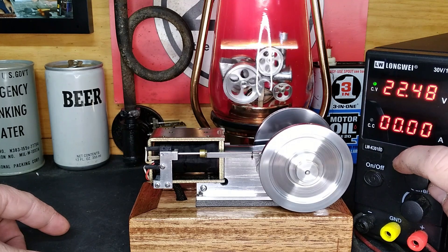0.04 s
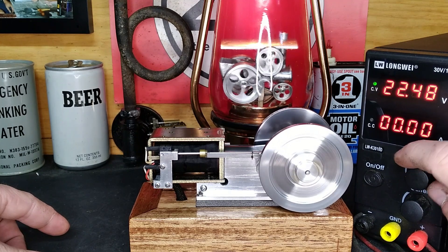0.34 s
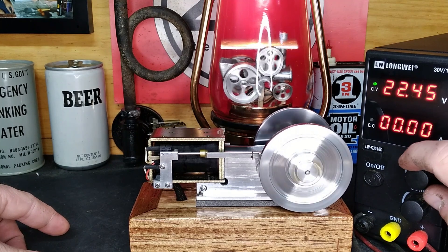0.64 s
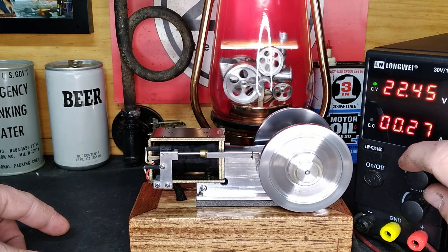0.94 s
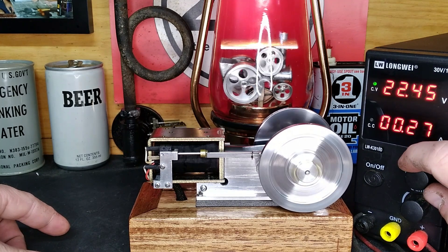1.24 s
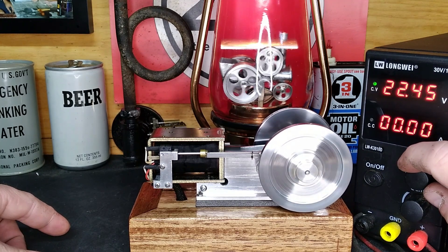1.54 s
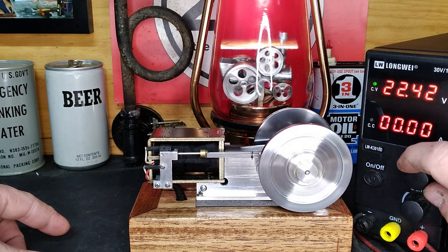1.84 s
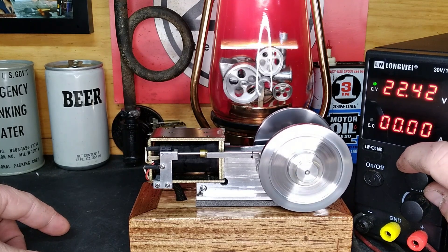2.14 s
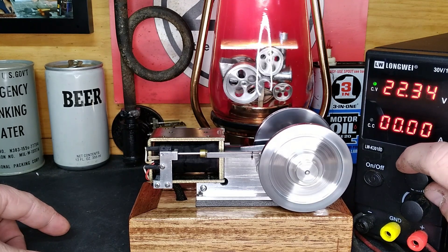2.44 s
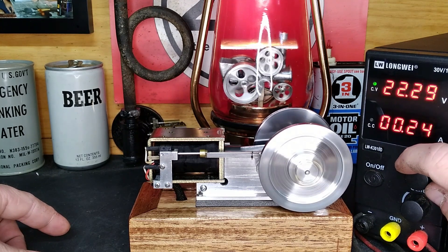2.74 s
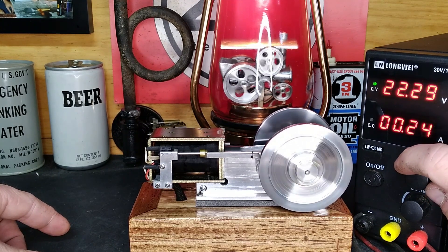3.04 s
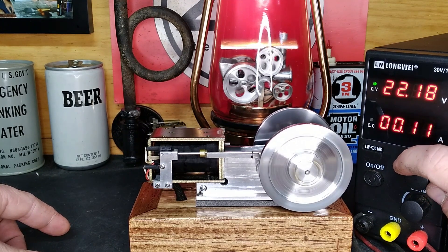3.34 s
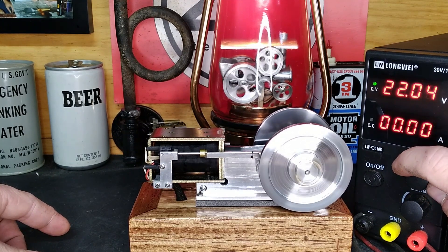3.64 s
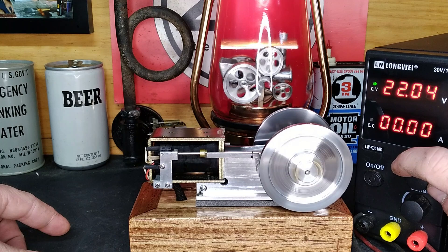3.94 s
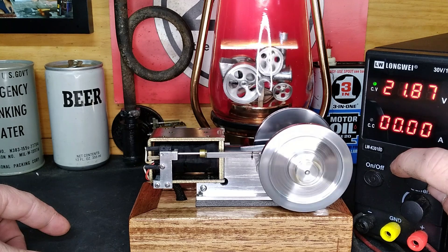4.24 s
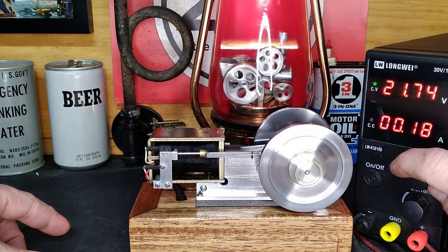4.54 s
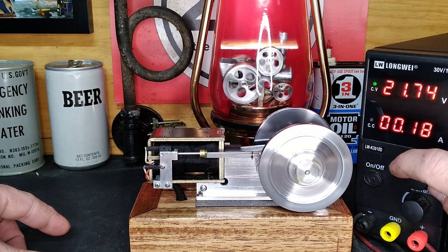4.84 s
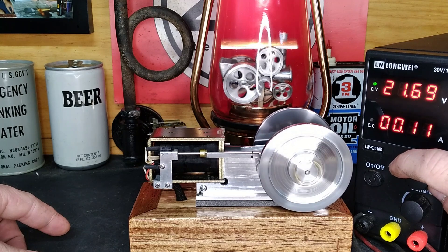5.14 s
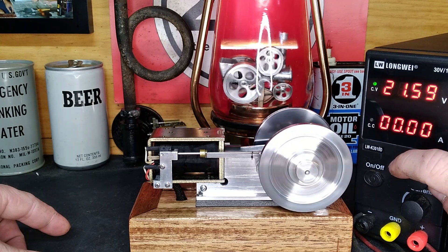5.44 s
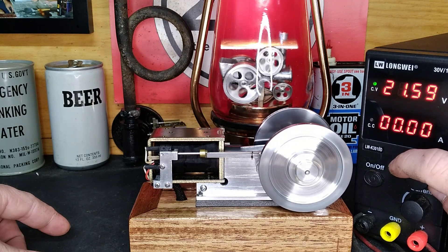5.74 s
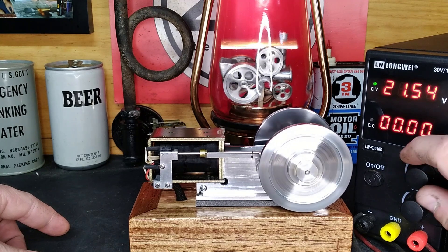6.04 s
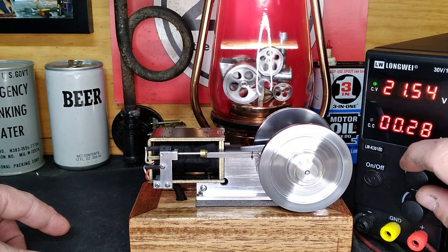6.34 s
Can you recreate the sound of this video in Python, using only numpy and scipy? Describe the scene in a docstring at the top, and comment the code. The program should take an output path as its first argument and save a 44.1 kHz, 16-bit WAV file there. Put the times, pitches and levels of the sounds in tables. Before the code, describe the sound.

A small electric model engine runs on a wooden base, close to the microphone in a small room. Its loose linkage ticks, slaps and clacks about ten times a second, the clacks carrying a thin, high steel ring. Roughly every half second a clack drops out and the coil gives a soft thump, then the flywheel coasts and slows slightly. The pattern repeats throughout over a low rumble and a faint hush.

```python
"""A small hit-and-miss solenoid engine clacks away on a wooden base, close by in a small room.
Each turn of its flywheel works the loose linkage: light ticks, a slap of the rod, and a clack
that sets a small steel part ringing. Every sixth turn the coil pulls its plunger in with a soft
thump, and the slap and clack stay away; then the wheel coasts and slows until the next pull.
Underneath are the rumble of the crank, short echoes off the walls and a faint hush of air."""
import sys
import numpy as np
from scipy import signal
from scipy.fft import rfft, irfft, next_fast_len
from scipy.io import wavfile

SR = 44100
rng = np.random.default_rng(int(sys.argv[2]) if len(sys.argv) > 2 else 0)


def int16_out(signal):
    """Quantize to a 16-bit WAV file."""
    q = np.round(np.clip(np.atleast_2d(signal).T, -1, 1) * 32767)
    wavfile.write(sys.argv[1], SR, q.astype(np.int16))


N = 287091


def amp(db):
    """Turns decibels into a number to multiply a sound by."""
    return 10 ** (np.asarray(db) / 20)


def curve_at(points, hz):
    """Looks up a curve at hz, joining its points by straight lines on a pitch scale."""
    f, value = np.transpose(points)
    return np.interp(np.log(hz + 1), np.log(f), value)


def add(mix, s, sound):
    """Mixes a sound in at s seconds."""
    at = round(s * SR)
    sound = sound[max(-at, 0):]
    part = mix[max(at, 0):][:len(sound)]
    part += sound[:len(part)]


def panned(x, db):
    """Makes the left side louder than the right by db."""
    return x * amp(db * np.array([[.5], [-.5]]))


def blows(times, db, rise_s, fall_s):
    """A loudness outline that leaps up at each blow and dies away."""
    t, out = np.arange(SR // 10) / SR, np.zeros(N)
    shape = (1 - np.exp(-t / rise_s)) ** 2 * np.exp(-t / fall_s)
    for s, gain in zip(times, amp(db) / shape.max()):
        add(out, s, gain * shape)
    return out


# How alike noise is in the two ears: f/Hz, likeness (1 = the same)
EAR_LIKENESS = [(100, 0.94), (1500, 0.6), (4000, 0.23), (15000, 0.022)]

def rattle(outline, tone, side=None, grit_db=0, size=2048):
    """Many tiny, uneven contacts: noise that follows a loudness outline, with a tone for each ear."""
    length = next_fast_len(N, True)
    left, other = rfft(rng.standard_normal((2, length)))
    alike = np.clip(curve_at(EAR_LIKENESS, np.fft.rfftfreq(length, 1 / SR)), -1, 1)
    right = alike * left + np.sqrt(1 - alike ** 2) * other
    noise = irfft(np.array([left, right]), length)[:, :N]
    grit = amp(grit_db * np.repeat(rng.uniform(-1, 1, N // 20 + 1), 20)[:N])
    hz = abs(np.fft.fftfreq(size, 1 / SR))
    balance = panned(1, 0 if side is None else curve_at(side, hz))
    gain = amp(curve_at(tone, hz)) * balance / np.sqrt((balance ** 2).mean(0))
    # a filter that never sounds ahead of the blow
    taps = np.fft.ifft(np.exp(signal.hilbert(np.log(gain)).conj())).real
    taps /= np.sqrt((taps ** 2).sum(1).mean() * np.mean(grit ** 2))
    return signal.oaconvolve(noise * grit * outline, taps, axes=1)[:, :N]


def knocks(times, db, hz, swell_s):
    """Each blow bends the frame, which swings a few times and stops."""
    t, out = np.arange(SR // 20) / SR, np.zeros(N)
    shape = t / swell_s * np.exp(1 - t / swell_s)
    for s, gain, f, phase in zip(times, amp(db), hz, rng.random(len(times))):
        add(out, s, gain * shape * np.sin(2 * np.pi * (f * t + phase)))
    return out


def ring(times, db, notes, scatter_db, rise_s):
    """A struck part rings at its own notes; each blow shares its force among them a little differently."""
    hz, note_db, fade_s, side_db, lead = np.transpose(notes)
    t, out = np.arange(SR // 5)[:, None] / SR, np.zeros((2, N))
    waves = amp(note_db - 60 * t / fade_s) * np.exp(2j * np.pi * hz * t) * (1 - np.exp(-t / rise_s))
    ears = panned(np.exp(.5j * lead * np.array([[1], [-1]])), side_db)
    for s, gain, (size, phase) in zip(times, amp(db), rng.standard_normal((len(times), 2, len(notes)))):
        shares = ears * amp(scatter_db * size) * np.exp(.5j * phase)
        left, right = gain * (shares @ waves.T).imag
        add(out[0], s, left)
        add(out[1], s, right)
    return out


# Tone of the still room: f/Hz, level/dB
AIR_TONE = [(25, -16), (120, 4), (900, -21.5), (5000, -12), (9000, -3), (16000, -9)]

def room_air():
    """The still room gives a faint, steady hush."""
    return rattle(amp(-64.5), AIR_TONE)


def room_echoes(x, tail_db=-13, fade_s=.15, echo_s=.0068, echo_db=-13):
    """Sound bounces off the back wall and around the room in scattered echoes that die away."""
    t = np.arange(SR // 2) / SR
    tail = rng.choice([-1, 1], (2, len(t))) * (rng.random((2, len(t))) < .1)
    tail = tail * (t > .004) * amp(-60 * t / fade_s)
    tail *= amp(tail_db) / np.linalg.norm(tail[0])
    tail[:, round(echo_s * SR)] += amp(echo_db)
    return signal.fftconvolve(x, tail, axes=1)[:, :N]


# Tone of the sliding plunger: f/Hz, level/dB
SLIDE_TONE = [(100, -1), (260, -21), (390, 4.5), (580, -5.5), (780, 2.5), (1050, -16), (1600, -40),
              (5000, -53)]
# Notes of the wooden base: f/Hz, level/dB, time to fade 60 dB/s, left over right/dB, left lead/rad
WOOD_NOTES = [(76, -10, 0.036, -2, 0.061), (119.5, -15.5, 0.21, -3, 0.27), (140.5, -1.5, 0.091, 3, 0.18),
              (195.5, -9, 0.26, 3, 0), (372, -3.5, 0.1, -2, 0.3), (875, 11.5, 0.012, -3, 0.029)]
# Pulls of the coil: t/s (the wheel is left at full speed), level/dB (of the thump, relative)
PULLS = [(-0.2988, -47), (0.2828, -47.5), (0.8699, -48.5), (1.4579, -44.5), (2.0504, -47), (2.6449, -49),
         (3.241, -47.5), (3.8364, -46), (4.4383, -48), (5.0469, -48), (5.657, -44), (6.2724, -47.5),
         (6.8905, -45.5)]

def solenoid(slide_s=.0349, home_s=.0348):
    """The coil draws the plunger in, thumping the wooden base home_s before the turn ends."""
    ends, db = np.transpose(PULLS)
    times = ends - home_s
    slide = blows(times - slide_s, db + .068, rise_s=.0061, fall_s=.0069)
    slide += blows(times - .012, db - 2.5, rise_s=.0084, fall_s=.0072)
    return rattle(slide, SLIDE_TONE) + ring(times - .001, db + 3, WOOD_NOTES, scatter_db=3.5, rise_s=.00098)


def flywheel(coasts=5, slowing=.0483, powered_length=1.104):
    """Each turn's start, length and whether the coil fires: the wheel slows until the next pull."""
    pulls = np.transpose(PULLS)[0]
    share = np.append((1 + slowing) ** np.arange(coasts), powered_length)
    period = np.outer(np.diff(pulls), share / share.sum()).ravel()
    fired = np.arange(len(period)) % len(share) == coasts
    return pulls[0] + np.cumsum(period) - period, period, fired


USUAL_TURN_S = .1

def strength(force, period):
    """How hard a part hits in each turn: the wheel's speed sets it, with a little chance."""
    db, lost_db_per_ms, lost_db_per_ms2, chance_db = force
    longer_ms = 1000 * (period - USUAL_TURN_S)
    level = db - lost_db_per_ms * longer_ms - lost_db_per_ms2 * longer_ms ** 2
    return level + chance_db * rng.standard_normal(len(period))


POWERED_DB = -3.5  # the coil's pull holds the joints tight, so they hit more softly
# Force in the joints: level/dB, loss/(dB/ms), loss/(dB/ms^2), chance/dB
JOINT_FORCE = (-39.5, 0.3134, 0.0031, 1.63)
# Tone of the crank's rumble: f/Hz, level/dB
RUMBLE_TONE = [(25, -36), (145, -1.5), (240, -11), (310, -17.5), (550, -7.5), (760, 3), (1200, -3),
               (3000, -21)]
# Knocks of the stiff frame: crank angle/turns, f/Hz, level/dB (relative)
FRAME_KNOCKS = [(0.04, 299, -23), (0.187, 372, -27.5), (0.548, 371, -33.5)]

def crank():
    """The swinging crank shakes the base, and knocks the frame as it takes up the load."""
    start, period, fired = flywheel()
    level = strength(JOINT_FORCE, period) + POWERED_DB * fired
    shake = rattle(blows(start + .0021, level - 16, rise_s=.0094, fall_s=.0061), RUMBLE_TONE)
    for angle, hz, db in FRAME_KNOCKS:
        knock = knocks(start + angle * period, level + db, np.full(len(start), hz), swell_s=.0068)
        shake += panned(knock, db=-6)
    return shake


# Ticks, coasting and powered: crank angle/turns, level/dB, knock f/Hz, knock level/dB (levels relative)
COASTING_TICKS = [(0.002, 6, 820, -11), (0.08, -6, 1900, -11.5), (0.13, 7, 1950, -2.5),
                  (0.208, -1, 1050, -14), (0.358, 7.5, 2100, -30), (0.478, 8.5, 1500, -26)]
POWERED_TICKS = [(0.002, 5, 830, -13), (0.08, -7, 1900, -11), (0.153, 5, 1940, -1), (0.26, 2, 1500, -28),
                 (0.318, -2, 1500, -28), (0.527, 2, 1650, -9), (0.612, 5, 1550, -5)]
# Tone of a tick: f/Hz, level/dB
TICK_TONE = [(100, -36), (1200, -23), (2100, -11), (2700, -7.5), (3700, -8.5), (5000, -8), (6800, -6.5),
             (7700, 6.5), (8500, -0.5), (9400, 5.5), (10500, -5), (13000, -5), (15800, -6.5)]
# Where a tick leans: f/Hz, left over right/dB
TICK_LEAN = [(4500, 0), (6800, 1.5), (7700, 12), (9200, 8.5), (11000, -11), (12800, 40), (15000, -19)]

def ticks(scatter_db=1.6, wander=.007, detune=.06, slow_s=.108, slack_db=14, lag_per_s=2.2):
    """Loose joints tap at set crank angles; as the wheel slows, the late ticks lag and at last fade."""
    start, period, fired = flywheel()
    turn_db = strength(JOINT_FORCE, period) + POWERED_DB * fired
    slack = np.clip((period - slow_s) / (period.max() - slow_s), 0, 1)
    outline, body = np.zeros(N), np.zeros(N)
    for pattern, turns in (COASTING_TICKS, ~fired), (POWERED_TICKS, fired):
        for angle, db, hz, knock_db in pattern:
            loose = (angle > .3) * ~fired  # only late ticks in coasting turns
            level = (turn_db - slack_db * slack * loose)[turns]
            lag = (lag_per_s * (period - USUAL_TURN_S) * loose)[turns]
            late, size, pitch = rng.standard_normal((len(level), 3)).T
            times = start[turns] + period[turns] * (angle + lag + wander * late * np.sqrt(abs(angle)))
            outline += blows(times, level + db + scatter_db * size, rise_s=.000098, fall_s=.0032)
            body += knocks(times, level + knock_db + 2.5, hz * (1 + detune * pitch), swell_s=2.2 / hz)
    return rattle(outline, TICK_TONE, TICK_LEAN, grit_db=6) + panned(body, db=-4)


# Force of the rod: level/dB, loss/(dB/ms), loss/(dB/ms^2), chance/dB
ROD_FORCE = (-27, 0.3229, 0.0272, 0.83)
# Tone of a slap: f/Hz, level/dB
SLAP_TONE = [(100, -17), (500, -24), (800, -8.5), (1400, -18.5), (2000, 3.5), (2600, -17.5), (3700, 4.5),
             (4200, -2), (4700, 0), (5500, -11), (6900, 2), (8700, 2), (10500, 0), (13000, -11),
             (15800, -69)]
# Where a slap leans: f/Hz, left over right/dB
SLAP_LEAN = [(2200, -1), (4600, -9), (5500, -3), (6900, 3.5), (8800, 10.5), (10700, -3.5), (13000, 9)]

def slaps(angle=.206):
    """The connecting rod slaps over as it changes direction in each coasting turn."""
    start, period, fired = flywheel()
    times = (start + period * angle)[~fired]
    db = strength(ROD_FORCE, period[~fired])
    outline = blows(times, db + 2, rise_s=.000076, fall_s=.0014)
    outline += blows(times, db - 3.5, rise_s=.0057, fall_s=.0014)
    return rattle(outline, SLAP_TONE, SLAP_LEAN)


# Force of a clack's crack, ring and knock: level/dB, loss/(dB/ms), loss/(dB/ms^2), chance/dB
CRACK_FORCE = (-27.5, 0.26, -0.004, -0.63)
RING_FORCE = (-23, 0.27, 0.13, 2.2)
FRAME_FORCE = (-35, 0.27, 0.01, 2.26)
# Clacks that land unusually square or glancing: t/s, extra ring level/dB, extra knock level/dB
UNEVEN_CLACKS = [(0.033, 1, -4), (0.519, 3, 0), (1.507, 1, 4), (1.797, 5, -3), (2.884, 5, -2),
                 (3.383, 3, 0), (3.48, -12, 0), (3.581, 4, 0), (3.688, -13, 0), (4.289, 1, 6),
                 (5.192, 4, 0), (5.291, -4, 1), (5.395, 2, 4), (5.505, 0, -7), (5.708, -4, 2),
                 (5.803, 3, -3), (5.903, -3, 0), (6.008, -8, -3), (6.324, -4, 3), (6.42, -5, 3)]
# In the slowest turns the slack link snaps over just before the clack: t/s, level/dB (relative)
LINK_SNAPS = [(4.286, -30), (4.8892, -22.5), (5.501, -22.5), (6.114, -22)]
# Notes of the steel part: f/Hz, level/dB, time to fade 60 dB/s, left over right/dB, left lead/rad
STEEL_NOTES = [(8915, -1.5, .075, 0, 1.0), (9030, 0, .035, 3, 0), (9066, -3.5, .115, 4, -0.6),
               (9160, -11, .1, -8, -2.7), (9305, -9.5, .075, -1, 0.1), (10325, -17, .04, -3, -0.6),
               (10632, -15, .04, 3, 0.8)]
# Tone of a clack: f/Hz, level/dB
CLACK_TONE = [(100, -54), (900, -26.5), (2200, -9), (2800, -19.5), (3900, -19), (4800, -11.5), (6500, -10),
              (7500, -0.5), (8400, 4), (9700, -1), (11000, -5), (13000, -7.5), (15800, -21.5)]
# Where a clack leans: f/Hz, left over right/dB
CLACK_LEAN = [(4000, -0.5), (6800, 2), (8000, 8.5), (9500, -7.5), (11000, 11), (13000, -5.5), (15000, 35)]

def clacks(angle=.5488, knock_hz=1556, detune=.04):
    """A hard hit on each coasting return: a crack, a knock, and steel whose close notes waver."""
    start, period, fired = flywheel()
    times = (start + period * angle)[~fired]
    db, ring_db, knock_db = (strength(f, period[~fired]) for f in (CRACK_FORCE, RING_FORCE, FRAME_FORCE))
    for s, more_ring_db, more_knock_db in UNEVEN_CLACKS:
        nearest = np.argmin(abs(times - s))
        ring_db[nearest] += more_ring_db
        knock_db[nearest] += more_knock_db
    snap_s, snap_db = np.transpose(LINK_SNAPS)
    outline = blows(times - .0015, db + 1.5, rise_s=.0016, fall_s=.0037)
    outline += blows(times + .0011, db + 3, rise_s=.0001, fall_s=.00011)  # the sharp crack
    outline += blows(snap_s, snap_db, rise_s=.00028, fall_s=.0026)
    pitches = knock_hz * (1 + detune * rng.standard_normal(len(times)))
    knock = knocks(times, knock_db, pitches, swell_s=.0014)
    hit_s, hit_db = np.append(times + .0015, snap_s), np.append(ring_db, snap_db - 8)
    steel = ring(hit_s, hit_db, STEEL_NOTES, scatter_db=1.5, rise_s=.0005)
    return rattle(outline, CLACK_TONE, CLACK_LEAN, grit_db=6) + knock + steel


def scene():
    """The engine, its echoes and the hush of the room."""
    engine = ticks() + slaps() + clacks() + solenoid() + crank()
    return engine + room_echoes(engine) + room_air()


def record(dry, ceiling=.55, low_hz=58, high_hz=16050):
    """The microphone thins the deep bass, rounds off the sharpest cracks and cuts the highest treble."""
    thin = signal.sosfilt(signal.butter(2, low_hz, "high", fs=SR, output="sos"), dry)
    rounded = ceiling * np.tanh(thin / ceiling)
    lowpass = signal.firwin(255, high_hz, window=("kaiser", 9), fs=SR)
    return signal.oaconvolve(rounded, lowpass[None], "same")


dry = scene()
out = record(dry)
int16_out(out)
```